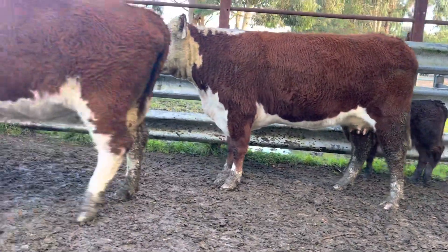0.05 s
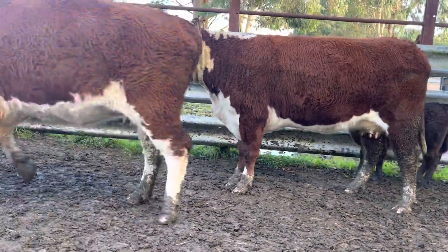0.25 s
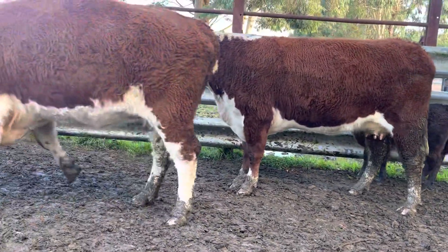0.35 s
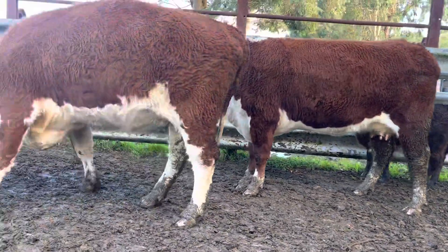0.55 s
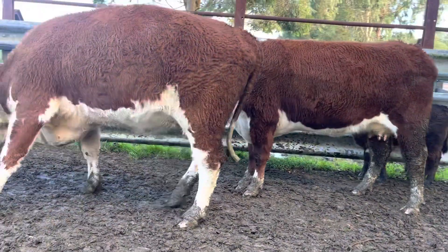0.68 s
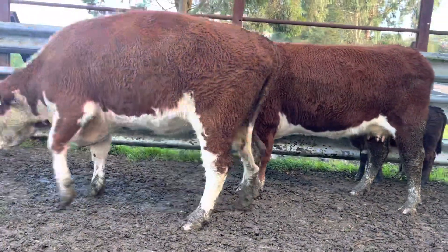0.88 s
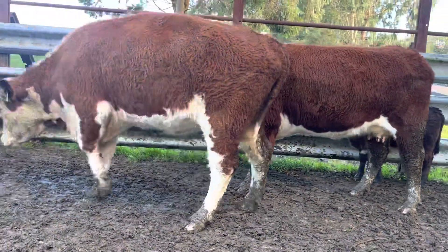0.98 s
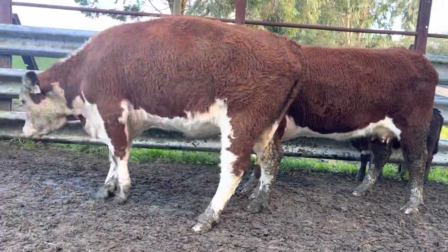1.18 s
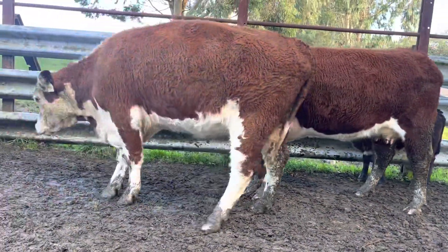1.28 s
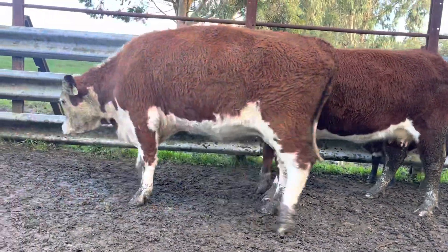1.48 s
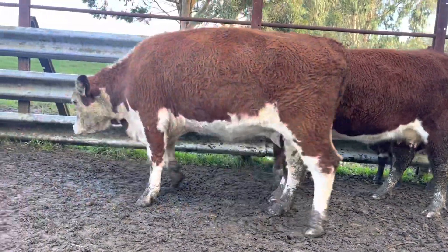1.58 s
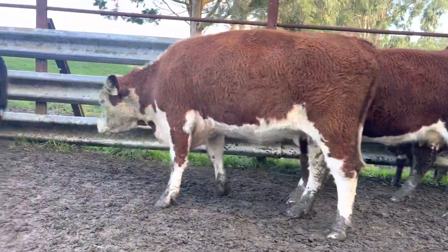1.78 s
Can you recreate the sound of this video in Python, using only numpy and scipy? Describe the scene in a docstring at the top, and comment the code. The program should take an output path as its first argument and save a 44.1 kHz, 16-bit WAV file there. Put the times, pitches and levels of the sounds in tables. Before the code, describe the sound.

Cow hooves step in a muddy outdoor pen, close to the microphone. A small wet crackle comes first, then a few low thuds with squelching and popping mud, over light wind rumble and an even hiss.

```python
"""Cow walking through mud

A cow walks past in a muddy outdoor pen while others shift their feet. Each hoof thuds and
churns the soft ground; air pockets pop in the mud, bubbles burst, wet grit crackles and ticks.
Light wind rumbles on the microphone over a steady outdoor hiss."""
import sys
import numpy as np
from scipy import signal
from scipy.fft import rfft, irfft, next_fast_len
from scipy.io import wavfile

SR = 44100
rng = np.random.default_rng(int(sys.argv[2]) if len(sys.argv) > 2 else 0)


def transcribe(u):
    """Save the signal u as a 16-bit wav file named by the first command-line argument.

    u: samples, shape (n,) or (channels, n), limited to [-1, 1]; the rate is SR.
    q: integer samples, one column per channel.
    """
    v = np.clip(np.atleast_2d(u).T, -1, 1)
    q = np.round(v * 32767).astype(np.int16)
    wavfile.write(sys.argv[1], SR, q)


N = 81585
T = np.arange(N) / SR

# outdoor hiss and wind rumble spectra (frequency [Hz], relative density [dB])
HISS_SPECTRUM_DB = [(40, -4), (130, 0.5), (400, -7), (800, -10), (1400, -11.5), (1950, -18.5), (5000, -19),
                    (7500, -26), (12000, -27.5), (14000, -30), (15300, -60)]
WIND_SPECTRUM_DB = [(25, -33), (45, 14.5), (68, 15.5), (110, 5), (200, -15.5), (400, -34.5)]
# outdoor hiss and wind gusts (time [s], level [dB])
HISS_LEVEL_DB = [(0, -45.5), (.15, -48), (.35, -47), (0.679, -44.5), (.97, -48), (1.2, -47.5),
                 (1.38, -47.5), (1.48, -49.5), (1.6, -48.5), (1.85, -46.5)]
WIND_LEVEL_DB = [(0, -43.5), (.11, -55.5), (.22, -42), (.35, -44.5), (.46, -46), (.6, -47), (.84, -38),
                 (1.0, -57.5), (1.075, -44), (1.36, -40), (1.46, -50.5), (1.6, -56.5), (1.85, -82)]
# grit and patter spectrum (frequency [Hz], relative density [dB])
GRIT_SPECTRUM_DB = [(500, -2), (1300, -2.5), (4000, 3), (5500, 0), (7500, -3.5), (11400, -1.5),
                    (15000, -22)]
# lone grains snapping (time [s], peak [dB], centre [Hz])
GRAIN_TICKS = [(.368, -37, 11800), (0.4455, -35.5, 4880), (.541, -35.5, 5200), (.625, -36.5, 4800),
               (0.667, -39.5, 11500), (1.01, -36, 11000), (1.5352, -28, 10900), (1.662, -34, 11100),
               (1.674, -30, 4900), (1.7449, -32.5, 11400), (1.763, -34.5, 11200)]
# wet grit squeezed out (time [s], hold [s], level [dB], tilt [dB/oct])
GRIT_SPRAYS = [(0.193, 0.0042, -48, -1.5), (0.2575, 0.015, -34.5, 0.7), (0.534, 0.004, -50, 3.5),
               (0.61, 0.066, -54.5, -6), (0.721, 0.0084, -48, 0), (0.801, 0.01, -39, -4.5),
               (0.903, 0.0084, -49.5, -1), (1.008, 0.0097, -46, -4), (1.26, 0.0053, -41.5, 1),
               (1.352, 0.045, -55.5, -4.5), (1.53, 0.038, -50, -5), (1.582, 0.014, -48, 0),
               (1.663, 0.015, -47.5, 1), (1.692, 0.057, -55.5, 0)]
# larger bubbles bursting (time [s], pitch [Hz], level [dB], t60 [s])
MUD_BUBBLES = [(.216, 1420, -37, .014), (0.259, 4020, -29, 0.033), (.267, 564, -35, 0.045),
               (0.269, 1295, -32, 0.032), (0.802, 1470, -27.5, 0.012), (.804, 918, -28, 0.03),
               (.807, 614, -27.5, 0.026), (0.864, 1150, -20, 0.0048), (1.036, 990, -23.5, 0.005),
               (1.092, 3080, -26.5, 0.0077), (1.313, 1760, -39.5, 0.02), (1.576, 808, -24.5, 0.016),
               (1.596, 675, -21, 0.011), (1.698, 2584, -39, .02), (1.835, 660, -28.5, 0.015)]
# clusters of air pockets popping (time [s], hold [s], level [dB], centre [Hz])
MUD_SQUELCHES = [(0.214, 0.0098, -41.5, 1230), (0.261, 0.016, -38.5, 1390), (0.483, 0.022, -47, 1800),
                 (0.467, 0.056, -48, 810), (0.583, 0.036, -48, 780), (0.618, 0.015, -44, 1180),
                 (0.657, 0.049, -46, 650), (0.8002, 0.01, -40.5, 1390), (0.892, 0.043, -41.5, 935),
                 (1.089, 0.003, -45, 2750), (1.232, 0.0046, -46, 1440), (1.26, 0.0077, -43.5, 1090),
                 (1.369, 0.03, -49.5, 1050), (1.573, 0.031, -42.5, 740), (1.571, 0.025, -51, 1410),
                 (1.785, 0.08, -51.5, 776)]
# ground churned under a hoof (time [s], hold [s], level [dB], centre [Hz])
HOOF_CHURNS = [(.512, 0.056, -32, 171), (0.553, 0.021, -29, 327), (.585, 0.052, -37.5, 187),
               (0.728, .04, -44.5, 118), (0.805, 0.045, -46, 189), (1.123, 0.057, -38, 165),
               (1.24, 0.081, -38.5, 184)]
# weight landing (time [s], pitch [Hz], peak [dB], t60 [s])
HOOF_THUDS = [(0.537, 63.4, -24, 0.068), (0.559, 107, -26.5, 0.21), (0.565, 246, -19.5, 0.014),
              (0.615, 65, -24.5, 0.027), (0.742, 76, -27.5, 0.13), (0.817, 93.3, -23, 0.081),
              (1.172, 52, -22.5, 0.033), (1.251, 123, -30.5, 0.057), (1.316, 61, -35, 0.11)]
# left-right likeness (frequency [Hz], correlation [-1..1])
STEREO_CORRELATION = [(60, .7), (400, .55), (800, .35), (1400, -.1), (2000, .6), (5300, .35), (7200, .55),
                      (7800, .995), (9000, .995), (9800, .65), (12000, .9)]
# microphone port balance (frequency [Hz], left minus right [dB])
PORT_BALANCE_DB = [(400, 0), (1000, 0.2), (1500, -5.5), (1900, 4.5), (2700, 0), (4000, 6), (5300, 5.5),
                   (7700, 0.5)]
# microphone port phase (frequency [Hz], left lead [rad])
PORT_LEAD_RAD = [(300, .1), (2200, .3), (3500, .9), (5000, .6), (6000, -.9), (7100, -1.7), (7850, -3.05),
                 (9050, -3.25), (10000, -4.7), (11500, -6.2), (13200, -6.5), (15000, -9.3)]


def from_db(db):
    """Decibels to gain."""
    return 10 ** (np.asarray(db) / 20)


def unit_rms(x):
    """Scale to unit power."""
    return x / np.sqrt(np.mean(x ** 2) + 1e-20)


def at_hz(table, hz):
    """Interpolate a table over log frequency."""
    knots_hz, values = np.transpose(table)
    return np.interp(np.log(hz), np.log(knots_hz), values)


def colour(x, db_at):
    """Zero-phase filter; db_at maps Hz to gain in dB."""
    n = next_fast_len(x.shape[-1] + SR // 20)
    hz = np.maximum(np.arange(n // 2 + 1) * SR / n, 1)
    return irfft(rfft(x, n) * from_db(db_at(hz)), n)[..., :x.shape[-1]]


def widen(mid, side):
    """Stereo from two unrelated signals, weighted by the correlation table."""
    mid = colour(mid, lambda hz: 10 * np.log10(1 + at_hz(STEREO_CORRELATION, hz)))
    side = colour(side, lambda hz: 10 * np.log10(1 - at_hz(STEREO_CORRELATION, hz)))
    return np.array([mid + side, mid - side])


def clicks(per_s, spread_db, shape):
    """Random clicks of uneven strength and either sign."""
    strength = from_db(spread_db * np.minimum(rng.exponential(1, shape), 4))
    sign = rng.choice([-1, 1], shape)
    return strength * sign * (rng.random(shape) < per_s / SR)


def ring(x, hz, t60_s):
    """Resonator: each click starts a decaying sine."""
    radius, angle = from_db(-60 / (t60_s * SR)), 2 * np.pi * hz / SR
    return signal.lfilter([0, np.sin(angle)], [1, -2 * radius * np.cos(angle), radius ** 2], x + 1e-18)


def hoof_pressure(hold_s, release_s, attack_s=0.0035):
    """Linear attack, hold, exponential release."""
    t = T[:SR // 5]
    return np.minimum(t / attack_s, 1) * np.exp(-np.maximum(t - hold_s, 0) / release_s)


def at_level(burst, envelope, db):
    """Give a burst the energy of its envelope at that level."""
    return unit_rms(burst) * np.sqrt(np.mean(envelope ** 2)) * from_db(db)


def add(out, time_s, x):
    """Mix x into out at time_s."""
    start = int(np.clip(time_s * SR, 0, N - 1))
    out[:, start:start + x.shape[-1]] += x[..., :N - start]


def moving_air(spectrum_db, level_db):
    """Hiss or wind: coloured stereo noise under a level curve."""
    noise = widen(*rng.standard_normal((2, N)))
    noise = colour(noise, lambda hz: at_hz(spectrum_db, hz))
    return from_db(np.interp(T, *np.transpose(level_db))) * unit_rms(noise)


def herd_patter(level_db=-66):
    """Other cattle trample faintly, further off."""
    steps = widen(*clicks(per_s=350, spread_db=5, shape=(2, N)))
    return from_db(level_db) * unit_rms(colour(steps, lambda hz: at_hz(GRIT_SPECTRUM_DB, hz)))


def reflections(x, gain_db=-2, t60_s=0.079, delay_s=0.003):
    """Brief scatter off rails and flanks, partly different in each ear."""
    t = T[:SR // 5]
    echoes = widen(*rng.standard_normal((2, len(t)))) * from_db(-60 * t / t60_s) * (t > delay_s)
    echoes /= np.sqrt(np.sum(echoes ** 2, axis=1, keepdims=True))
    return from_db(gain_db) * signal.fftconvolve(x, echoes, axes=1)[:, :N]


def grain_ticks(t60_cycles=10, fade_s=0.0014):
    """Lone grains snap in a tiny, high-pitched cluster of fractures."""
    out = np.zeros((2, N))
    t = T[:SR // 50]
    for time_s, db, hz in GRAIN_TICKS:
        fractures = rng.standard_normal(len(t)) * np.exp(-t / fade_s)
        crack = ring(fractures, hz, t60_cycles / hz)
        add(out, time_s, from_db(db) * crack / np.abs(crack).max())
    return out


def spurts(n, spread_db=3.5, step_s=0.003):
    """Grit lets go unevenly: a gain that wanders every few milliseconds."""
    knots_s = np.arange(0, n / SR + step_s, step_s)
    return from_db(spread_db * np.interp(T[:n], knots_s, rng.standard_normal(len(knots_s))))


def grit_sprays():
    """Hoof pressure squeezes out wet grit in a bright crackle."""
    out = np.zeros((2, N))
    for time_s, hold_s, db, tilt_db_per_oct in GRIT_SPRAYS:
        pressure = hoof_pressure(hold_s, release_s=0.0091)
        grains = clicks(per_s=4000, spread_db=3, shape=(2, len(pressure)))
        crackle = widen(*(grains * pressure * spurts(len(pressure))))
        tilt_db = lambda hz: tilt_db_per_oct * np.log2(np.maximum(hz, 800) / 4000)
        crackle = colour(crackle, lambda hz: at_hz(GRIT_SPECTRUM_DB, hz) + tilt_db(hz))
        add(out, time_s, at_level(crackle, pressure, db))
    return out


def bubbles(rise_per_s=2.5, attack_cycles=0.98):
    """Each bubble plops, its pitch climbing slightly as it surfaces."""
    out = np.zeros((2, N))
    t = T[:SR // 10]
    for time_s, hz, db, t60_s in MUD_BUBBLES:
        plop = np.sin(2 * np.pi * hz * (t + rise_per_s * t ** 2 / 2))
        attack = np.minimum(hz * t / attack_cycles, 1)
        add(out, time_s, plop * attack * from_db(db - 60 * t / t60_s))
    return out


def cavities(pressure, centre_hz, per_s, t60_cycles, spread_oct, side_db, sizes=12):
    """Cavities of many sizes collapse under pressure, each ringing for a few cycles."""
    out = np.zeros((2, len(pressure)))
    for offset in np.linspace(-2, 2, sizes):
        octaves = spread_oct * (offset + rng.uniform(-0.2, 0.28))
        hz = min(centre_hz * 2 ** octaves, SR / 3)
        collapses = clicks(per_s / sizes, spread_db=1.5, shape=out.shape) * pressure
        out += np.exp(-offset ** 2 / 2) * ring(collapses, hz, t60_cycles / hz)
    mid, side = out
    return widen(unit_rms(mid), from_db(side_db) * unit_rms(side))


def squelches():
    """Air pockets pop around the hooves; near and in front, so narrow in stereo."""
    out = np.zeros((2, N))
    for time_s, hold_s, db, hz in MUD_SQUELCHES:
        pressure = hoof_pressure(hold_s, release_s=0.011)
        pops = cavities(pressure, hz, per_s=1500, t60_cycles=5.3, spread_oct=0.44, side_db=-3)
        add(out, time_s, at_level(pops, pressure, db))
    return out


def churning():
    """Clods give way under a hoof in a dull, lumpy rumble."""
    out = np.zeros((2, N))
    for time_s, hold_s, db, hz in HOOF_CHURNS:
        pressure = hoof_pressure(hold_s, release_s=0.019)
        clods = cavities(pressure, hz, per_s=900, t60_cycles=4.8, spread_oct=0.56, side_db=0)
        add(out, time_s, at_level(clods, pressure, db))
    return out


def hoof_thuds():
    """Landing weight sets off a short, soft-edged low ring in the ground."""
    out = np.zeros((2, N))
    t = T[:SR // 4]
    for time_s, hz, db, t60_s in HOOF_THUDS:
        attack = 1 - np.exp(-(2 * hz * t) ** 2)
        thud = np.sin(2 * np.pi * hz * t) * attack * from_db(-60 * t / t60_s)
        add(out, time_s, from_db(db) * thud / np.abs(thud).max())
    return out


def scene():
    """Hooves in mud, wind and open air."""
    mud = squelches() + bubbles() + grit_sprays() + herd_patter()
    hooves = hoof_thuds() + churning() + mud + reflections(mud) + grain_ticks()
    wind = moving_air(WIND_SPECTRUM_DB, WIND_LEVEL_DB)
    hiss = moving_air(HISS_SPECTRUM_DB, HISS_LEVEL_DB)
    return hooves + wind + hiss


def record(dry):
    """Two microphone ports differ in level and phase; lowest bass and top are cut."""
    low_cut_hz, high_cut_hz = 35, 15000
    n = next_fast_len(N + SR // 20)
    hz = np.maximum(np.arange(n // 2 + 1) * SR / n, 1)
    share = np.array([[0.5], [-0.5]])
    port_gain = from_db(share * at_hz(PORT_BALANCE_DB, hz))
    port_phase_rad = share * at_hz(PORT_LEAD_RAD, hz)
    heard = irfft(rfft(dry, n) * port_gain * np.exp(1j * port_phase_rad), n)[:, :N]
    heard = signal.sosfilt(signal.butter(3, low_cut_hz, "high", fs=SR, output="sos"), heard)
    return signal.sosfilt(signal.ellip(8, 0.5, 80, high_cut_hz, fs=SR, output="sos"), heard)


dry = scene()
out = record(dry)
transcribe(out)
```